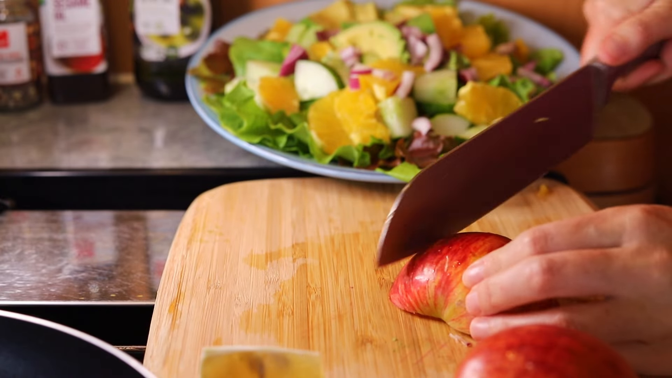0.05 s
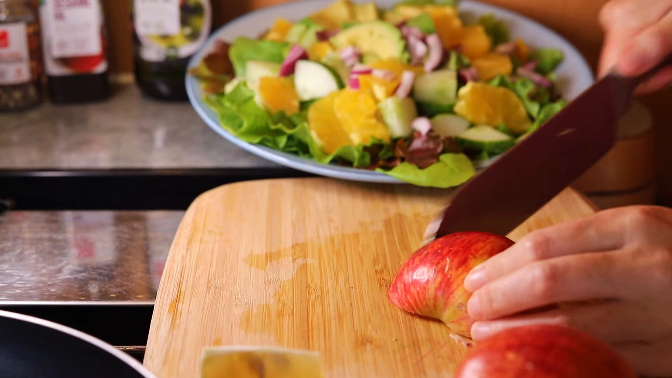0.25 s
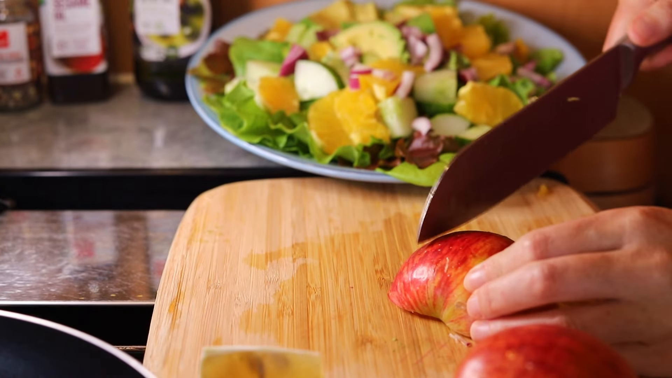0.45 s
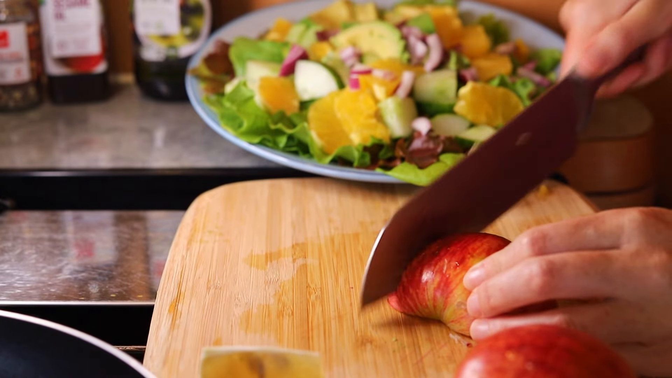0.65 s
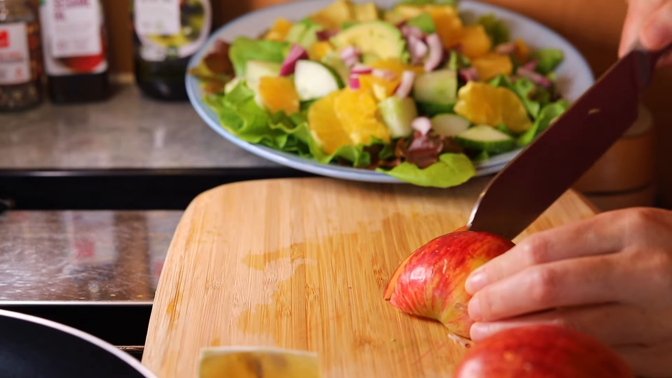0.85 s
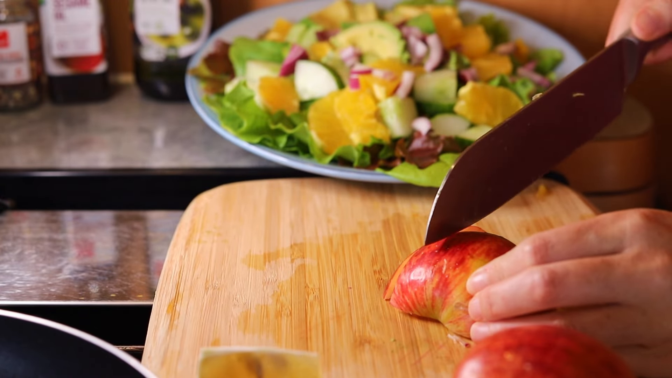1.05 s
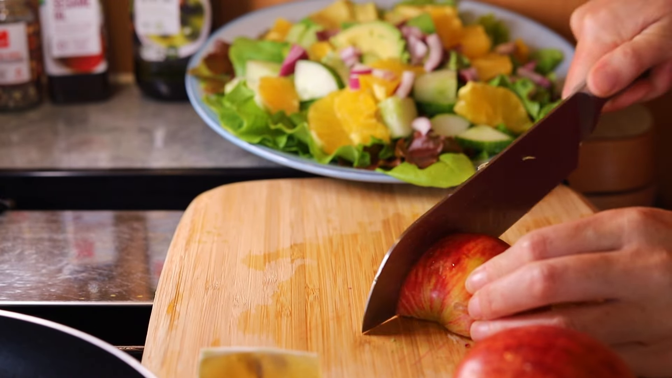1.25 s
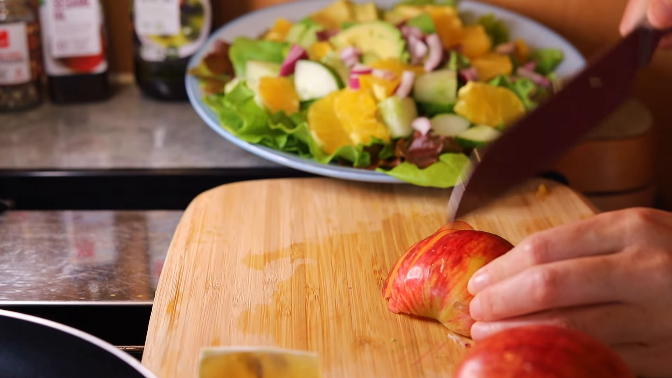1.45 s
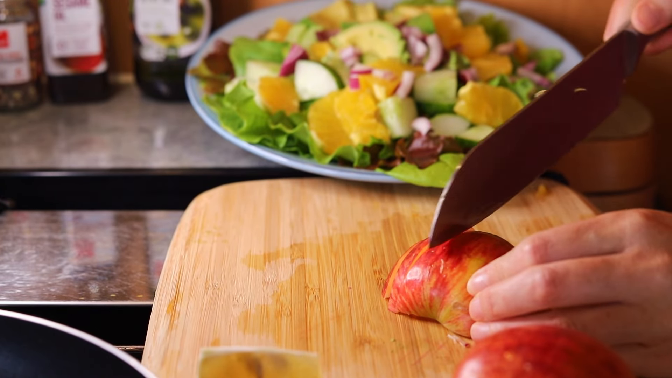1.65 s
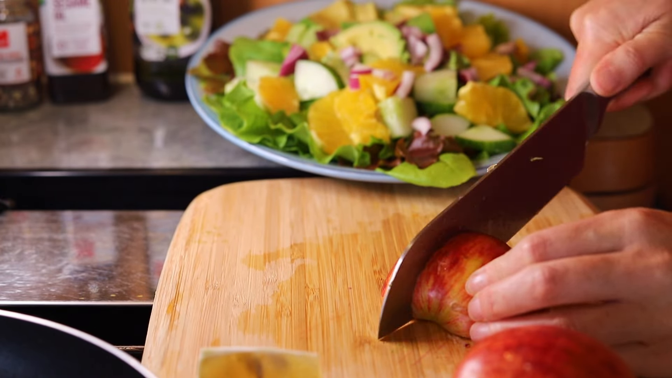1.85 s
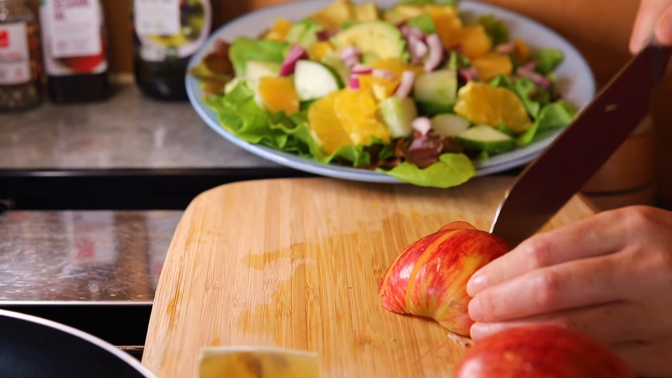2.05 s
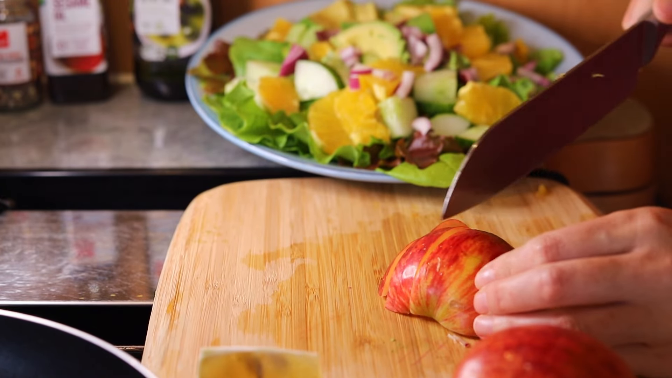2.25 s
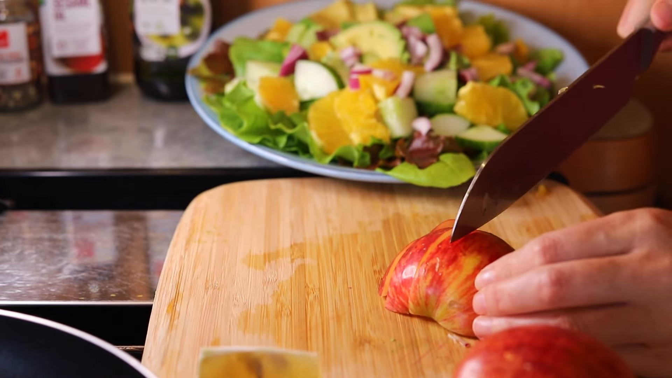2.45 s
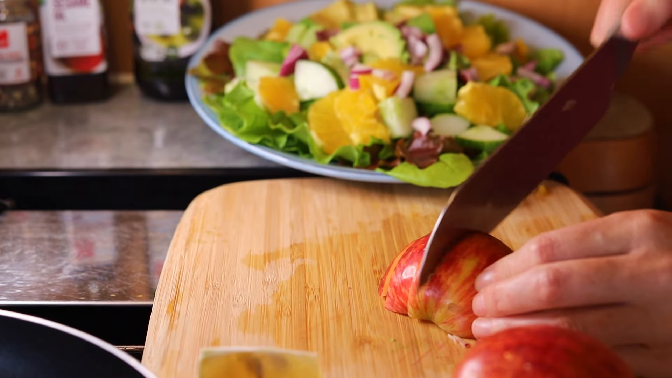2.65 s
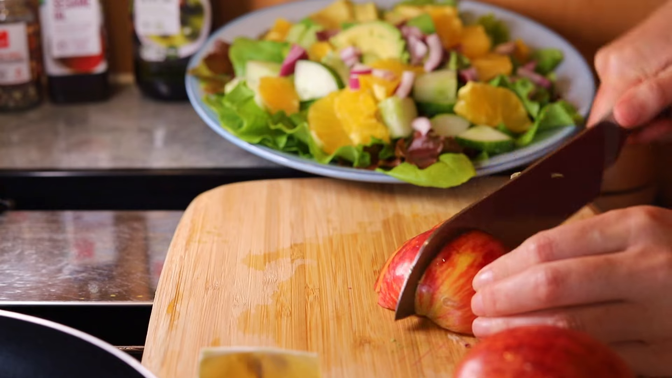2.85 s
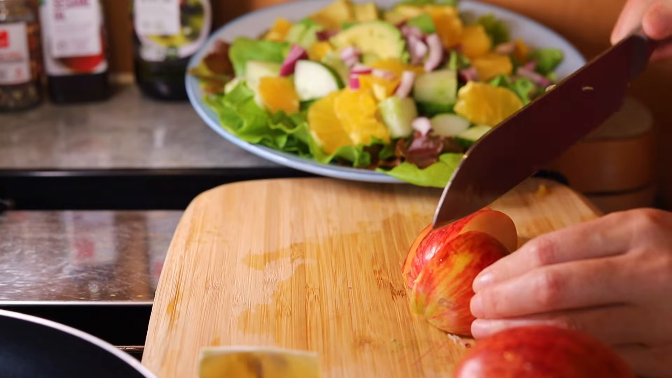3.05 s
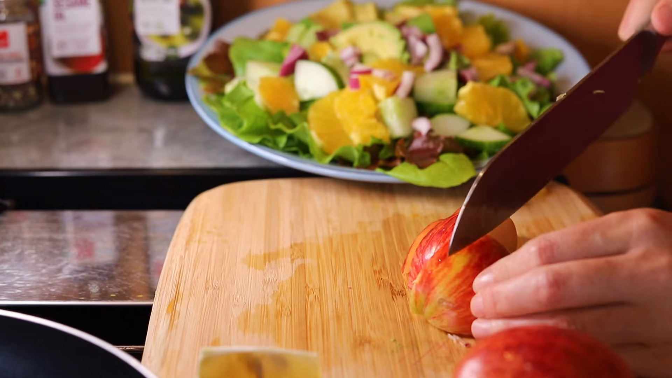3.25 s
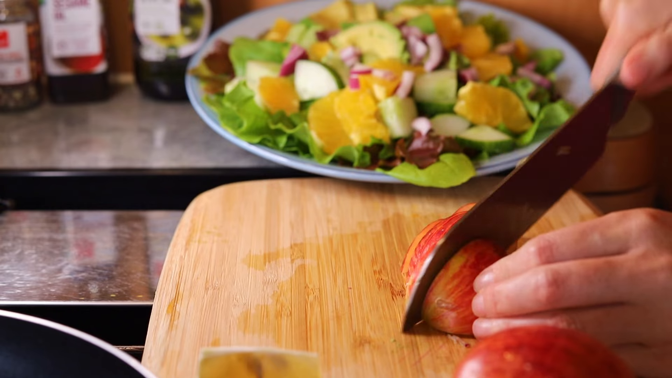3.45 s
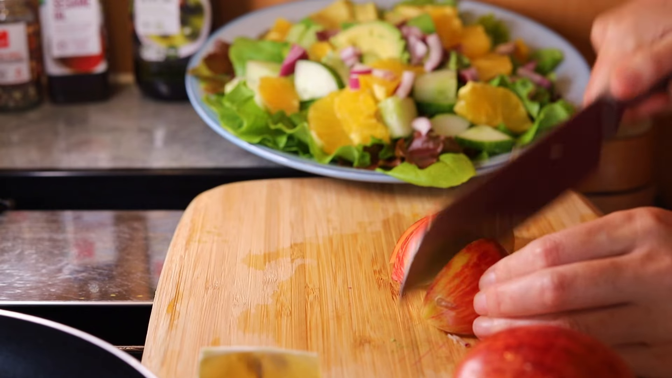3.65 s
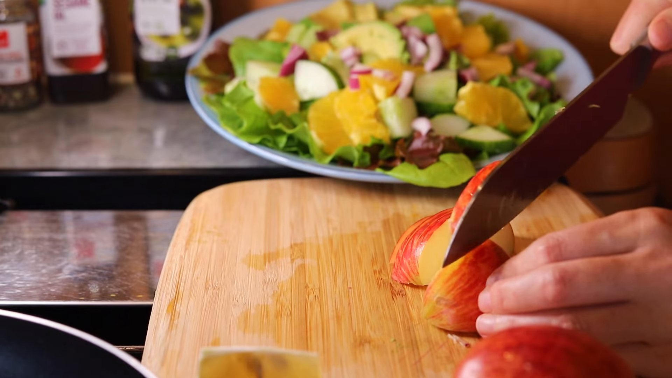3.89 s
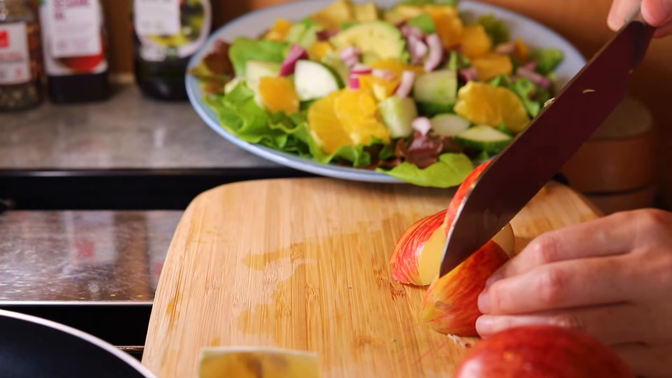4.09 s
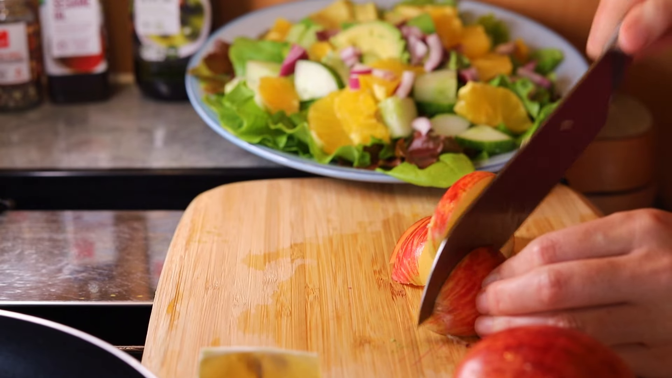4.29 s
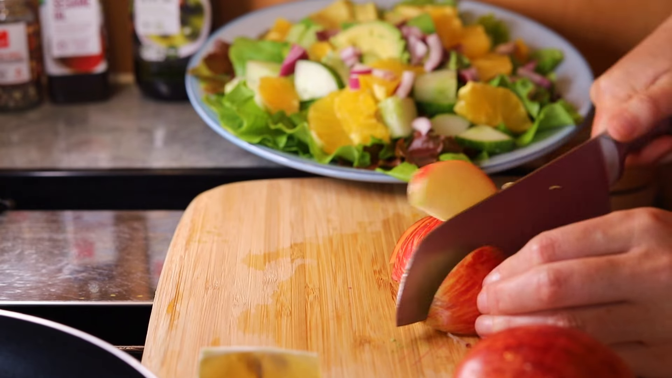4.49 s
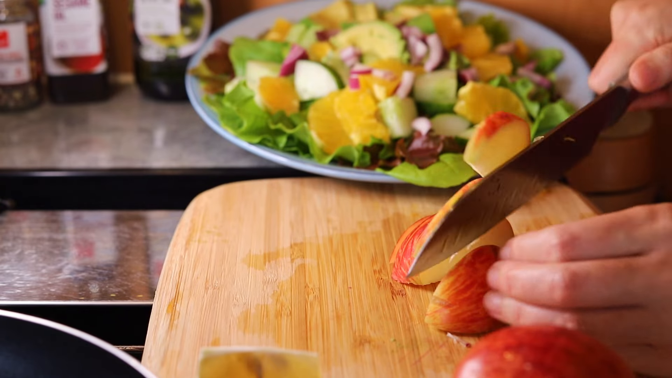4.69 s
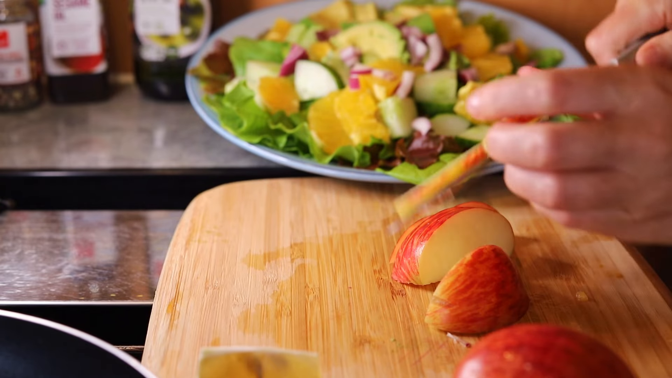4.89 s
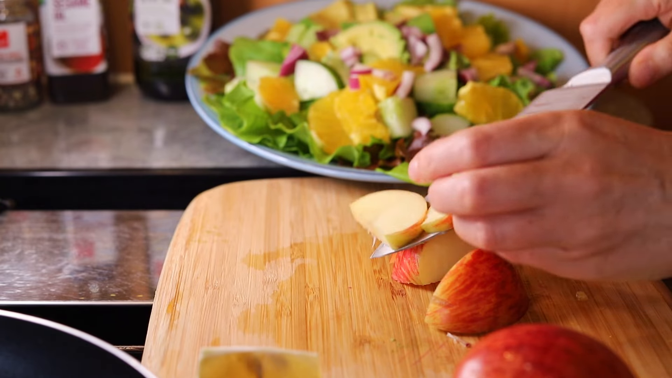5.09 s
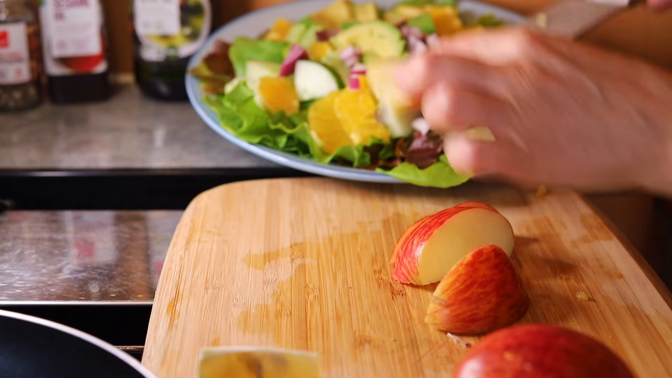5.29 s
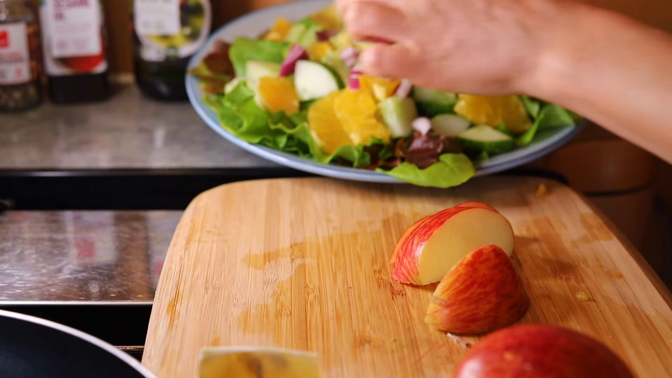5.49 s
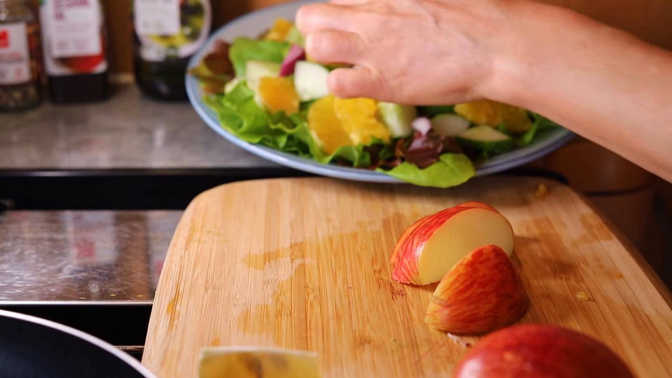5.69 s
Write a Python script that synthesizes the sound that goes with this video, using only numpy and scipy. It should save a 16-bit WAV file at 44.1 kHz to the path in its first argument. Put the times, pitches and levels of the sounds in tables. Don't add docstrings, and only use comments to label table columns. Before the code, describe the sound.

Close-up apple cutting: short juicy hisses, hard knocks of blade on wood, squeaky withdrawals and soft ticks in a quiet small kitchen.

```python
import sys
import numpy as np
from scipy import signal
from scipy.fft import rfft, irfft, next_fast_len
from scipy.io import wavfile
from scipy.ndimage import uniform_filter1d, map_coordinates

SR = 44100
rng = np.random.default_rng(int(sys.argv[2]) if len(sys.argv) > 2 else 0)


def master(y):
    cut = np.clip(np.atleast_2d(y).T, -1, 1)
    pcm = np.round(cut * 32767)
    wavfile.write(sys.argv[1], SR, pcm.astype(np.int16))


def invert_db(level):
    return 10 ** (np.asarray(level, dtype=float) / 20)


N = 252693


def unit(x):
    return x / np.sqrt(np.mean(x ** 2) + 1e-20)


def along(points, hz):
    f, v = np.transpose(points)
    return np.interp(np.log(hz + 1), np.log(f + 1), v)


def curves(rows):
    s, *cols = np.transpose(rows)
    return [np.interp(np.arange(N) / SR, s, c) for c in cols]


def wobble(rate):
    knots = rng.standard_normal(int(N * rate / SR) + 4)
    return map_coordinates(knots, [np.arange(N) * rate / SR])


def filtered(x, response):
    n = x.shape[-1]
    m = next_fast_len(n + SR // 4)
    return irfft(rfft(x, m) * response(np.fft.rfftfreq(m, 1 / SR)), m)[..., :n]


def place(out, start, sound):
    room = out[:, start:start + sound.shape[1]]
    room += sound[:, :room.shape[1]]


def resonances(modes, f):
    total = 0
    for k, (hz, width, db) in enumerate(modes):
        total = total + (-1) ** k * invert_db(db) * 1j * f * width / (hz * hz - f * f + 1j * f * width)
    return total


def pair(alike, patchy_db, grit_db):
    grains = rng.standard_normal((2, N)) * invert_db(grit_db * wobble(900))
    z = signal.stft(grains, nperseg=256)[2]
    patches = uniform_filter1d(rng.standard_normal(z.shape[1:]), size=2, axis=0)
    patches = uniform_filter1d(patches, size=12, axis=1)
    two = signal.istft(z * invert_db(patchy_db * unit(patches)), nperseg=256)[1][:, :N]

    def shares(hz):
        turn = np.arccos(np.clip(along(alike, hz), -1, 1)) / 2
        return np.array([np.cos(turn), np.sin(turn)])

    mid, side = filtered(two, shares)
    return np.array([mid + side, mid - side])


# (time [s], air level [dB], fan hum level [dB])
QUIET_LEVELS = [(0, -69, -79.5), (1.1, -68.5, -81.5), (2.3, -69, -80), (3.2, -68.5, -81.5), (4, -69, -80),
                (4.8, -69.5, -81.5), (5.4, -69, -78.5), (5.6, -67, -78), (5.73, -71.5, -86)]
# (frequency [Hz], level [dB per Hz])
AIR_COLOUR = [(60, -47), (100, -9), (160, -2), (300, -3), (500, -5), (800, -7), (1450, -8.5), (1850, -3),
              (2700, -2), (4000, -3.5), (6500, -6.5), (10000, -13.5), (15700, -21)]
# (frequency [Hz], likeness [-1 to 1])
AIR_LIKENESS = [(60, 0.34), (240, 0.16), (950, -0.29), (3770, -0.32), (15000, 0.23)]
# (frequency [Hz], level [dB per Hz])
RUMBLE_COLOUR = [(12, -43.5), (20, -19), (41, -2.5), (70, 3.5), (93, -2.5), (130, -17.5), (170, -53),
                 (290, -120)]


def background():
    air_db, hum_db = curves(QUIET_LEVELS)
    air = unit(filtered(pair(AIR_LIKENESS, patchy_db=-0.5, grit_db=1.5), lambda f: invert_db(along(AIR_COLOUR, f))))
    rumble = pair([(60, 1.0)], patchy_db=-0.5, grit_db=-0.3)
    rumble = unit(filtered(rumble, lambda f: invert_db(along(RUMBLE_COLOUR, f))))
    fan_hz = 68.5 + 3.4 * wobble(6.8)
    hum = np.sqrt(2) * np.sin(2 * np.pi * np.cumsum(fan_hz) / SR) * invert_db(1.8 * wobble(7))
    return invert_db(air_db + 1.0) * air + invert_db(-80.5 + 1.5 * wobble(2.3)) * rumble + invert_db(hum_db + 4.5) * hum


STEP = 16
SILENT_DB = -120


def ramp(start, end, start_db, end_db, rise, fall):
    end = max(end, start + 1 / SR)
    rise_from = start - (start_db - SILENT_DB) / rise
    gone = end + (end_db - SILENT_DB) / fall
    times = np.arange(0, N, STEP) / SR
    return np.interp(times, [rise_from, start, end, gone], [SILENT_DB, start_db, end_db, SILENT_DB])


def lifted(db):
    return db - 2 * np.maximum(-72 - db, 0)


# (bite time [s], landing time [s], hiss level at the bite [dB], hiss level at the landing [dB])
DOWN_STROKES = [
    (0.168, 0.204, -43.5, -45),
    (0.708, 0.752, -48, -45),
    (1.23, 1.319, -50, -44),
    (1.791, 1.909, -51.5, -45.5),
    (2.712, 2.795, -48, -50),
    (3.439, 3.529, -50.5, -41.5),
    (4.29, 4.401, -54.5, -43.5),
]
# (start time [s], free time [s], hiss level at the start [dB], hiss level when free [dB])
UP_STROKES = [(0.253, .352, -50, -52), (0.799, 0.913, -48.5, -57), (1.36, 1.4575, -48, -54),
              (1.968, 1.989, -46, -51), (1.994, 2.104, -51.5, -58.5), (2.818, 2.839, -54.5, -58),
              (2.871, 2.862, -48.5, -49.5), (2.903, 2.937, -56.5, -59), (2.995, 3.045, -56.5, -57.5),
              (3.557, 3.637, -49.5, -59), (3.671, 3.734, -74, -73.5), (4.173, 4.230, -65.5, -68.5),
              (3.417, 3.44, -50, -53), (.672, .69, -57, -56), (.134, .145, -55.5, -54.5),
              (4.424, 4.484, -45.5, -48.5), (4.565, 4.56, -63, -63), (5.558, 5.640, -72, -76)]
# (start time [s], end time [s], rub level [dB], rub level at the end [dB])
RUB_STROKES = [(.150, 0.196, -52.5, -34.5), (.235, 0.359, -47.5, -46), (0.336, 0.344, -41, -41.5),
               (.720, .750, -50.5, -39.5), (.775, 0.824, -53, -49.5), (0.842, 0.858, -41, -37),
               (0.868, 0.886, -41, -39), (.910, .930, -45.5, -57.5), (1.208, 1.310, -66, -42),
               (1.340, 1.371, -46.5, -48), (1.402, 1.413, -40.5, -42), (1.438, 1.441, -39.5, -36.5),
               (1.458, 1.468, -50, -54), (1.760, 1.827, -76, -67.5), (1.875, 1.900, -59, -50.5),
               (1.920, 2.001, -48.5, -47), (2.011, 2.092, -53.5, -47), (2.120, 2.15, -61.5, -66.5),
               (2.700, 2.783, -63, -55.5), (2.810, 2.843, -47.5, -47.5), (2.890, 2.918, -39.5, -53),
               (2.994, 3.033, -56, -45), (3.460, 3.515, -56, -46), (3.545, 3.575, -49.5, -52.5),
               (3.595, 3.623, -51, -52.5), (4.179, 4.250, -70, -79), (4.305, 4.390, -51, -46.5),
               (4.415, 4.478, -52, -44), (4.50, 4.52, -58, -62)]


def strokes():
    bite, stop, begin, free = 398, 1301, 1505.5, 386.5
    levels = []
    for a, b, a_db, b_db in DOWN_STROKES:
        hiss = ramp(a, b, a_db, b_db, bite, stop)
        ring = ramp(a - 0.025, b, a_db - 0.5, a_db + 1.5, bite, stop)
        levels.append((hiss, ring))
    for a, b, a_db, b_db in UP_STROKES:
        hiss = ramp(a, b, a_db, b_db, begin, free)
        ring = ramp(a, b, a_db + 5, b_db + 6.5, begin, free)
        levels.append((hiss, ring))
    rubs = [ramp(*row, rise=651, fall=652.5) for row in RUB_STROKES]
    loudest = np.vstack([np.max(levels, axis=0), np.max(rubs, axis=0)])
    return np.repeat(lifted(loudest), STEP, axis=1)[:, :N]


def snaps():
    when, size, sign, side = rng.random((4, N))
    torn = when < 600 / SR * np.exp(0.7 * wobble(60))
    loudness = invert_db(8 - 3 * np.log(size + 1e-9))
    return torn * np.sign(sign - .5) * loudness * np.array([side, 1 - side])


# (frequency [Hz], level [dB per Hz])
JUICE_COLOUR = [(530, -47.5), (900, -16), (1930, -5.5), (2100, -4.5), (2430, -6.5), (3240, 0), (3480, -1),
                (6950, -3.5), (12100, -17), (15700, -20)]
# (frequency [Hz], likeness [-1 to 1])
CUT_LIKENESS = [(600, 0.72), (2000, 0.93), (5000, 0.017), (12000, 0.49)]
# (frequency [Hz], width [Hz], level [dB])
BLADE_MODES = [(1560, 120, -7), (1920, 190, -4), (2490, 270, -0.5), (2740, 93, 1.5), (3050, 110, 0.5),
               (3600, 210, -11.5), (4350, 130, -4)]
# (frequency [Hz], width [Hz], level [dB])
HELD_BOARD_MODES = [(500, 77, -17), (676.8, 55, 4.5), (900, 50, -9.5), (1043, 220, -19), (1523, 16, -10.5)]


def slicing():
    hiss_db, ring_db, rub_db = strokes()
    hiss = pair(CUT_LIKENESS, patchy_db=2.5, grit_db=0.5) + snaps()
    hiss = filtered(hiss, lambda f: invert_db(along(JUICE_COLOUR, f) + [[-1.1], [1.1]]))
    ring = pair(CUT_LIKENESS, patchy_db=3.0, grit_db=-0.5)
    ring = filtered(ring, lambda f: resonances(BLADE_MODES, f) * invert_db([[-1.5], [1.5]]))
    push = invert_db(rub_db - 2 + 1.2 * wobble(70) + 1.5 * wobble(130)) * pair([(600, .8)], patchy_db=1.2, grit_db=2.0)

    def held(f):
        return resonances(HELD_BOARD_MODES, f) * 1j * f / (480 + 1j * f)

    size = np.sqrt(np.mean(np.abs(held(np.arange(SR // 2))) ** 2))
    grip = np.pi / 4 * (1 + np.tanh(4.5 * wobble(22)))
    rub = 0
    for share, shift in ((np.cos(grip), 1.035), (np.sin(grip), 0.965)):
        rub = rub + filtered(push * share, lambda f: held(f * shift) * invert_db([[.8], [-.8]])) / size
    uneven_hand_db = 1.18 * wobble(45)
    return invert_db(hiss_db + 4.0 + uneven_hand_db) * unit(hiss) + invert_db(ring_db - 4.5) * unit(ring) + rub


def board(f, modes):
    low = 370 / (1j * f + 1e-9)
    small = 1 / (1 + low / .8 + low ** 2) ** 2
    sides = []
    for side in (1, -1):
        sides.append(resonances([(hz, width, db + side * pan / 2) for hz, width, db, pan in modes], f))
    return small * np.array(sides)


# (frequency [Hz], width [Hz], level [dB], left minus right [dB])
BOARD_MODES = [(415, 54, -9.5, -1), (515.3, 38, -8.5, 1), (650, 114, -3, 2.5), (867, 180, -7.5, 1.5),
               (1034, 290, -13.5, -5), (1200, 87, -8.5, -4), (1475, 73, -10.5, 1), (1725, 65, -15, -6),
               (2017, 90, -13.5, -8.5), (2450, 110, -17, -0.5), (2580, 200, -20, -5.5),
               (3200, 310, -23, 2.5), (3700, 99, -23.5, 0.5)]
# (time [s], level [dB], hardness [Hz])
TIP_KNOCKS = [(.1937, -22, 2500), (.1998, -15, 2500), (.206, -25, 2500), (.752, -7, 2780),
              (1.3215, -15.5, 2500), (1.9018, -21, 3500), (1.904, -25, 2500), (1.9135, -22, 2000),
              (1.9695, -22, 2500), (2.7935, -20, 2500), (2.8719, -5.5, 3200), (3.5256, -11.5, 1710),
              (4.395, -23, 2200)]
# (time [s], level [dB], hardness [Hz])
BELLY_KNOCKS = [(.1972, -8.5, 900), (.2032, -11.5, 805), (.2062, -10.5, 700), (.7545, -7, 940),
                (.7612, -21.5, 800), (.770, -22.5, 795), (1.3125, -29, 800), (1.3155, -17, 800),
                (1.320, -18, 900), (1.3245, -10.5, 810), (1.336, -27, 700), (1.9048, -7, 770),
                (1.9115, -13.5, 800), (1.917, -16.5, 700), (1.9674, -13.5, 1100), (1.9705, -6, 750),
                (1.981, -21, 700), (2.7855, -22.5, 801), (2.789, -13.5, 812.5), (2.7925, -10, 800),
                (2.7965, -10, 740), (2.8015, -14, 756), (2.8748, -5, 847), (2.8805, -28, 802),
                (3.5253, -20, 1000), (3.528, -6.5, 855), (3.538, -24, 700), (4.3982, -3, 685),
                (4.405, -18, 601)]
# (time [s], level [dB])
LOWEST_MODE_REACH = [(0, -25.5), (1.5, -5.5), (2, -4), (3, -2), (4.5, -7)]
# (frequency [Hz], width [Hz], level [dB])
STEEL_CLICK = [(1800, 2400, -8.5)]


def knocks():
    tip, belly, cracks = np.zeros((2, N)), np.zeros((2, N)), np.zeros((2, N))
    t = np.arange(600) / SR
    for force, rows in ((tip, TIP_KNOCKS), (belly, BELLY_KNOCKS)):
        for s, db, hard_hz in rows:
            rate = 2 * np.pi * hard_hz
            push = invert_db(db + 34.0) * rate * t * np.exp(-rate * t) * rate / SR
            place(force, int(s * SR), np.array([push, push]))
            noise = rng.standard_normal((3, len(t)))
            crack = filtered(noise[0] + 0.28 * noise[1:],
                             lambda f: 1j * f / (800 + 1j * f) / (1 + 1j * f / hard_hz) ** 3)
            place(cracks, int(s * SR), invert_db(db - 9.5 - 60 * t / 0.0094) * crack)
    force = belly + filtered(tip, lambda f: 1j * f / (900 + 1j * f))
    reach_db = curves(LOWEST_MODE_REACH)[0]
    lowest = filtered(force * invert_db(reach_db), lambda f: board(f, BOARD_MODES[:1]))
    higher = filtered(force, lambda f: board(f, BOARD_MODES[1:]))
    click = filtered(tip, lambda f: resonances(STEEL_CLICK, f) ** 2)
    return lowest - higher + cracks + click


# (time [s], level [dB], frequency [Hz], time to fall 60 dB [s])
BOARD_THUDS = [(0.243, -71, 100, 0.17), (0.544, -75, 340, 0.089), (0.55, -55, 128, 0.11),
               (0.779, -53, 129, 0.18), (1.067, -67.5, 209.6, 0.26), (1.339, -65, 110, 0.32),
               (1.636, -52.5, 176, 0.13), (1.802, -65, 200, 0.18), (1.932, -63.5, 100, .2),
               (2.505, -60.5, 131, 0.16), (2.506, -58.5, 500, 0.053), (2.799, -66.5, 100, 0.35),
               (2.901, -60, 100, 0.12), (3.273, -56.5, 95, 0.19), (3.273, -61, 400, 0.066),
               (3.422, -64.5, 330, 0.72), (3.541, -69.5, 100, 0.75), (3.923, -64.5, 95, 0.32),
               (3.922, -62, 449, 0.047), (4.411, -68, 110, 0.33), (4.202, -72, 400, 1),
               (4.632, -66.5, 655, 0.077)]
# (time [s], level [dB])
COUNTER_JOLTS = [(.235, -66), (.75, -68.5), (1.35, -70), (1.66, -71), (1.96, -65.5), (2.52, -73.5),
                 (2.78, -70.5), (2.92, -71.5), (3.549, -66), (4.42, -74)]


def thuds():
    out, t = np.zeros((2, N)), np.arange(SR // 4) / SR
    jolts = [(s, db, 36, 0.32) for s, db in COUNTER_JOLTS]
    for s, db, hz, t60 in BOARD_THUDS + jolts:
        noise = rng.standard_normal((3, len(t)))
        thud = unit(filtered(noise[0] + .25 * noise[1:], lambda f: resonances([(hz, .8 * hz, 0)], f) ** 2))
        place(out, round(s * SR), invert_db(db - 60 * t / t60) * thud * (1 - np.exp(-t / 0.0011)))
    return out


# (start time [s], end time [s], frequency [Hz], level [dB])
BLADE_SQUEAKS = [(0.242, 0.353, 2470, -50.5), (0.36, 0.396, 1510, -55), (0.699, 0.727, 2490, -42.5),
                 (0.804, 0.875, 2490, -48.5), (0.874, 0.916, 4350, -52), (1.218, 1.273, 2490, -48),
                 (1.225, 1.27, 4350, -66), (1.447, 1.493, 1560, -52), (1.78, 1.832, 2490, -42.5),
                 (1.859, 1.906, 3600, -51), (2.018, 2.108, 3050, -54), (2.995, 3.014, 3050, -44),
                 (4.149, 4.21, 1936, -64.5), (4.166, 4.224, 3100, -73), (4.167, 4.24, 4410, -64.5),
                 (4.178, 4.202, 1200, -70), (4.292, 4.346, 1875, -51.5), (4.348, 4.417, 4350, -46),
                 (4.415, 4.49, 4350, -47.5), (4.435, 4.48, 3190, -43)]
# (start time [s], end time [s], frequency [Hz], level [dB])
FACE_SCUFFS = [(0.366, 0.404, 1000, -60), (.905, 0.934, 1090, -50.5), (.67, 0.75, 1340, -58.5),
               (1.464, 1.497, 1097, -62), (1.77, 1.856, 1350, -59.5), (2.04, 2.13, 1100, -55),
               (2.699, 2.78, 1400, -62.5), (2.98, 3.066, 990, -55.5), (3.41, 3.462, 1800, -57.5),
               (3.58, 3.669, 1050, -54.5), (4.489, 4.556, 843, -61), (4.558, 4.581, 1510, -67),
               (4.558, 4.59, 741, -69.5)]


def squeaks():
    out = np.zeros((2, N))
    drags = [(*row, 70) for row in BLADE_SQUEAKS] + [(*row, .7 * row[2]) for row in FACE_SCUFFS]
    for start, end, hz, db, width in drags:
        n = round((end - start) * SR)
        noise = rng.standard_normal((3, SR // 8))
        tone = unit(filtered(noise[0] + .5 * noise[1:], lambda f: resonances([(hz, width, 0)], f) ** 2))[:, :n]
        swell = np.hanning(tone.shape[1]) ** 1.1
        place(out, round(start * SR), invert_db(db + np.array([[-1.5], [1.5]])) * tone * swell)
    return out


# (time [s], peak level [dB], centre [Hz], width [share of centre])
SOFT_TOUCHES = [(.4398, -51.5, 2260, 0.73), (0.5392, -47.5, 2580, 0.32), (.5594, -60, 2454, .8),
                (1.6373, -41, 2490, 0.37), (2.505, -46.5, 3044, 0.36), (3.0932, -45.5, 13300, .6),
                (3.27, -43.5, 3900, 0.32), (3.394, -52.5, 4420, 0.4), (3.7694, -46.5, 3600, 0.28),
                (3.9242, -52, 3300, .62), (4.1739, -55, 1890, .87), (4.633, -38, 3040, 0.85),
                (5.697, -46, 2403, 1.3)]
# (time [s], peak level [dB])
SKIN_CRACKLES = [
    (4.1758, -43.5),
    (4.2636, -46),
    (4.2751, -40.5),
]


def touches():
    out, t = np.zeros((2, N)), np.arange(SR // 4) / SR
    crackles = [(s, db, 3200, 1) for s, db in SKIN_CRACKLES]
    for s, db, hz, share in SOFT_TOUCHES + crackles:
        noise = rng.standard_normal((3, len(t)))
        tick = unit(filtered(noise[0] + noise[1:],
                             lambda f: resonances([(hz, share * hz, 0)], f) / (1 + 1j * f / (7.5 * hz))))
        place(out, round(s * SR), invert_db(db - 7.0 - 60 * t / 0.059) * tick * (1 - np.exp(-t / 0.002)))
    return out


# (time [s], brush level [dB], time to fall 60 dB [s], first favoured mode [Hz], second favoured mode [Hz])
BRUSHES = [
    (1.527, -57.5, .05, 6085, 10330),
    (2.172, -55.5, 0.15, 7203, 6085),
    (2.211, -76, 0.044, 7203, 4630),
]
# (frequency [Hz], time to fall 60 dB [s], level [dB])
STEEL_MODES = [(2770, 0.075, 0.5), (4630, 0.073, 0), (5170, 0.082, -1), (6085, 0.085, -4),
               (7203, 0.11, -10), (7695, .07, -7.5), (10330, 0.065, -9), (11560, 0.073, -9),
               (13680, .045, -8.5), (14070, 0.064, -11), (15380, .06, -9)]


def tinkles():
    out, t = np.zeros((2, N)), np.arange(SR // 6) / SR
    for s, db, t60, *favoured in BRUSHES:
        ring = np.zeros((2, len(t)))
        for hz, long, mode_db in STEEL_MODES:
            near = min(abs(np.log(hz / f)) for f in favoured) < .03
            level = (6 if near else -1) + mode_db + rng.normal(0, 1.4)
            phase = rng.random() + .1 * rng.random((2, 1))
            ring += invert_db(level - 60 * t / long) * np.sin(2 * np.pi * (hz * t + phase))
        noise = rng.standard_normal((2, len(t)))
        brush = unit(filtered(noise, lambda f: resonances([(4400, 5100, 0)], f))) * invert_db(-60 * t / t60)
        place(out, round(s * SR), invert_db(db) * (1 - np.exp(-t / 0.0021)) ** 2 * (ring + brush))
    return out


# (frequency [Hz], time to fall 60 dB [s])
KITCHEN_DECAY = [(200, 0.29), (700, 0.18), (2000, 0.15), (5000, 0.016), (12000, 0.02)]


def kitchen(x):
    hz, t, z = signal.stft(rng.standard_normal((2, SR // 2)), SR, nperseg=256)
    fade = invert_db(-60 * t / along(KITCHEN_DECAY, hz)[:, None])
    tail = signal.istft(z * fade, SR, nperseg=256)[1]
    late = np.pad(x, ((0, 0), (250, 0)))
    return signal.fftconvolve(late, tail / np.linalg.norm(tail[0]), axes=1)[:, :N]


def scene():
    near = slicing() + knocks() + thuds() + squeaks() + touches()
    lag = 3.5 / SR
    near = filtered(near, lambda f: np.exp(-1j * np.pi * f * lag * np.array([[1], [-1]])))
    near = near + tinkles()
    return near + invert_db(-21) * kitchen(near) + background()


def top_cut(x):
    return signal.sosfilt(signal.butter(12, 15830, fs=SR, output="sos"), x)


def record(dry):
    mix = filtered(dry, lambda f: f < 15830)
    return top_cut(mix)


dry = scene()
out = record(dry)
master(out)
```